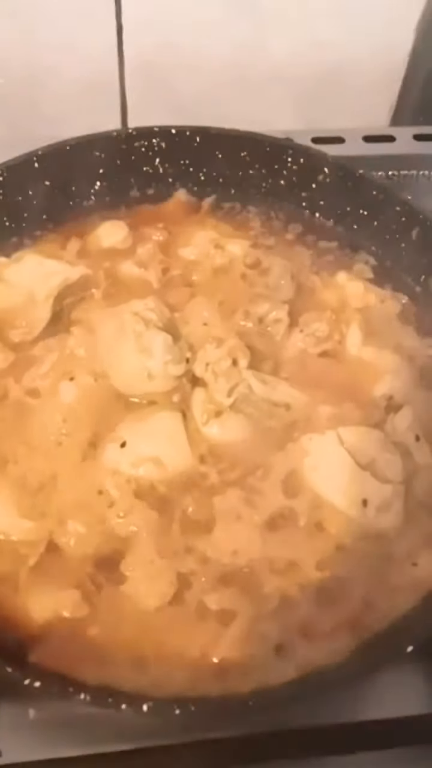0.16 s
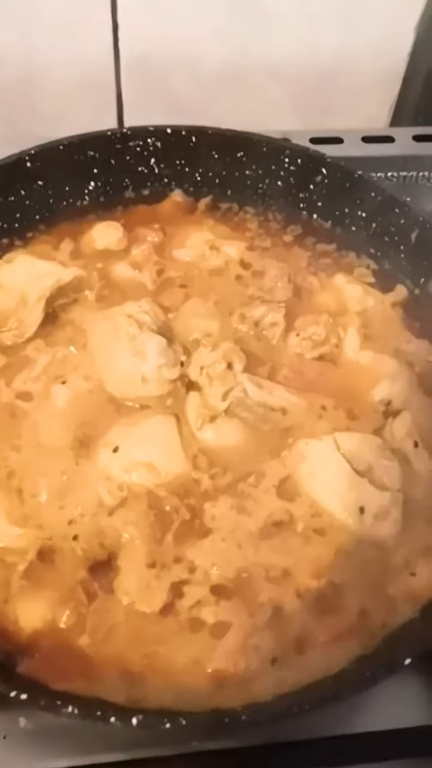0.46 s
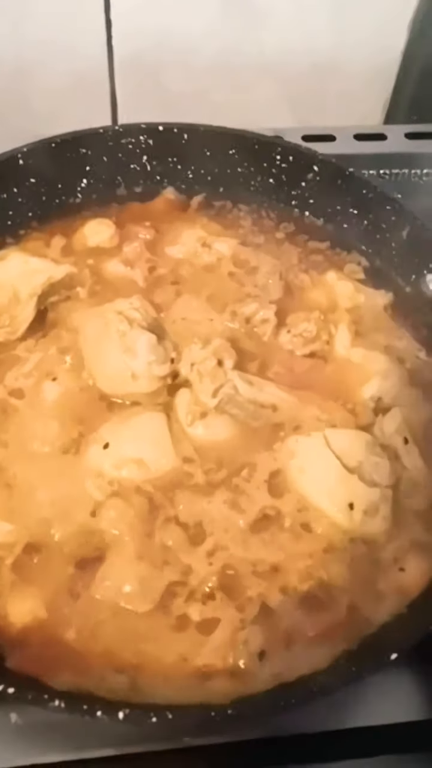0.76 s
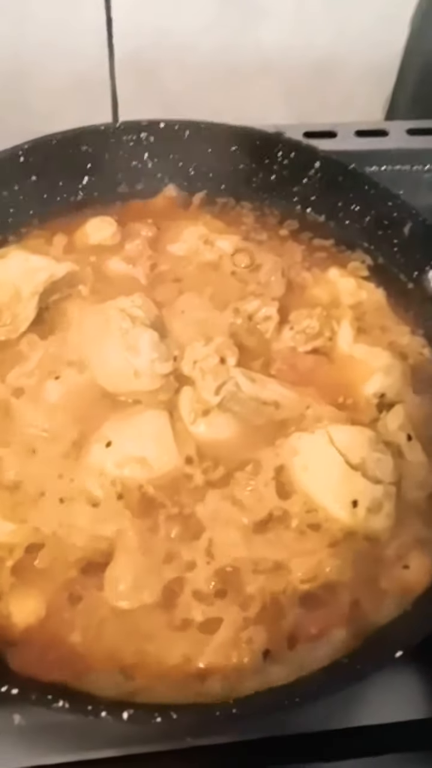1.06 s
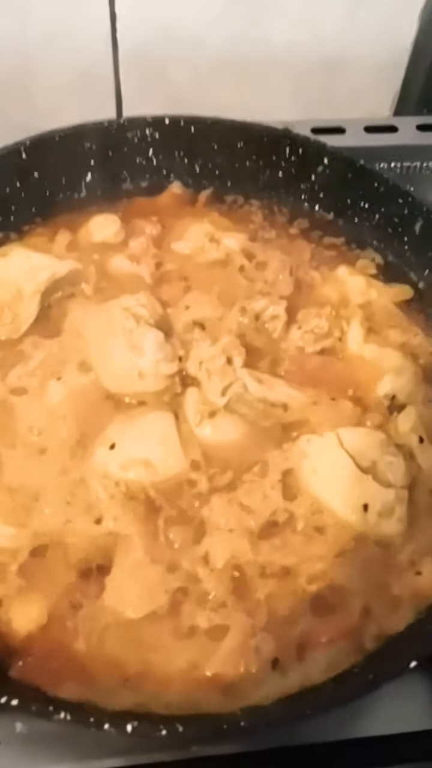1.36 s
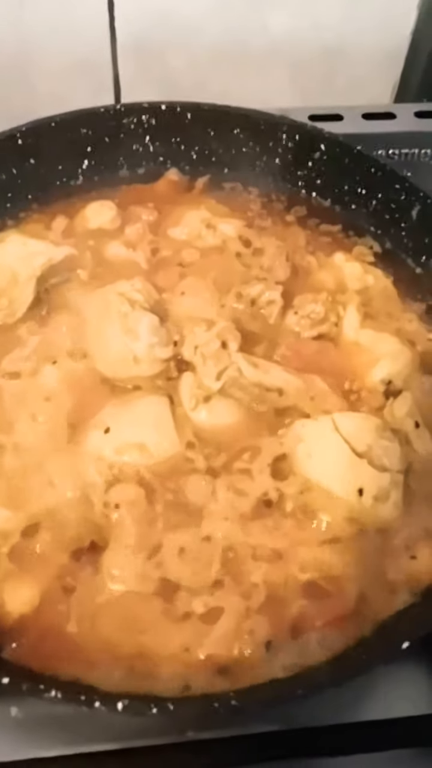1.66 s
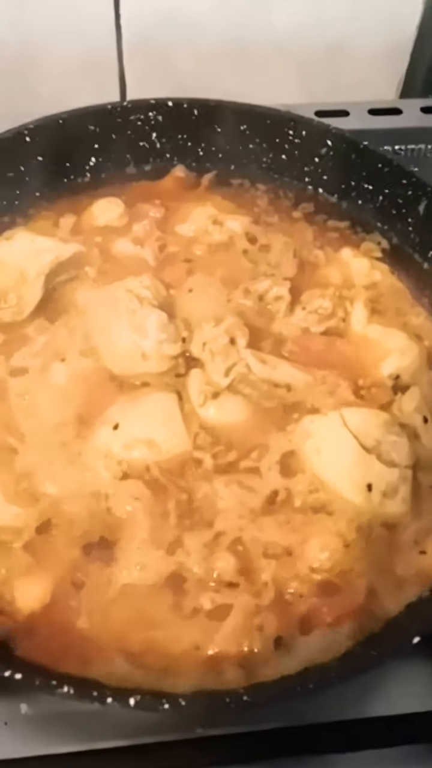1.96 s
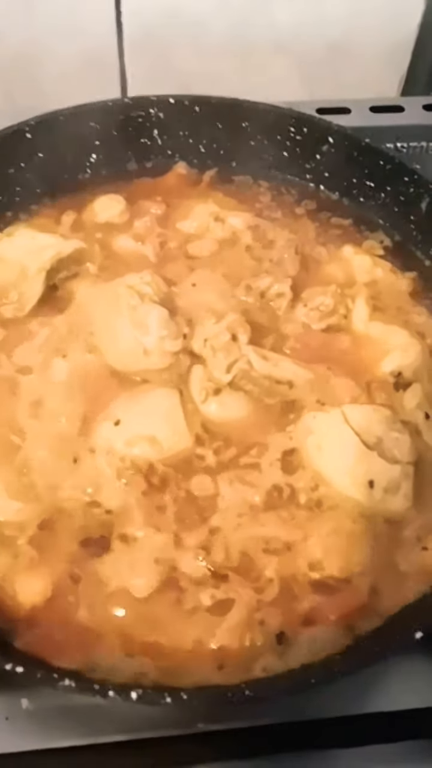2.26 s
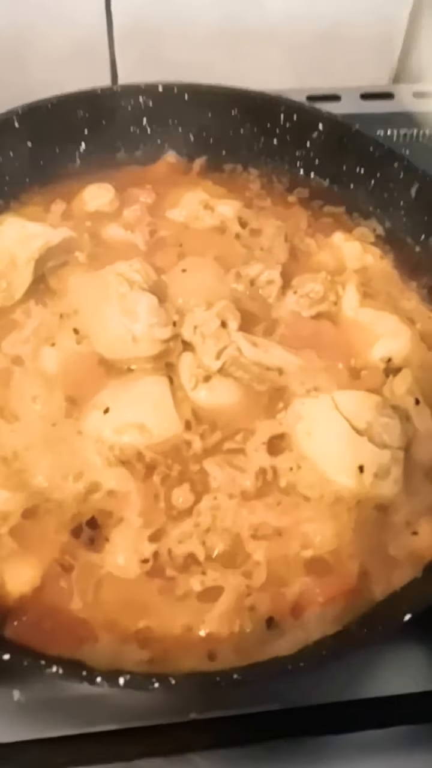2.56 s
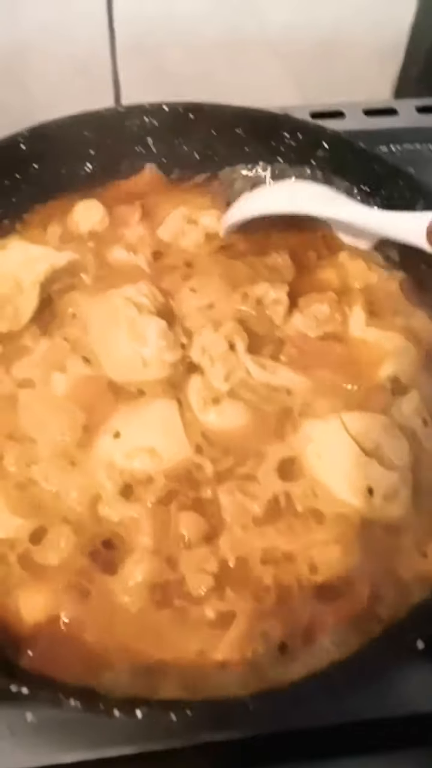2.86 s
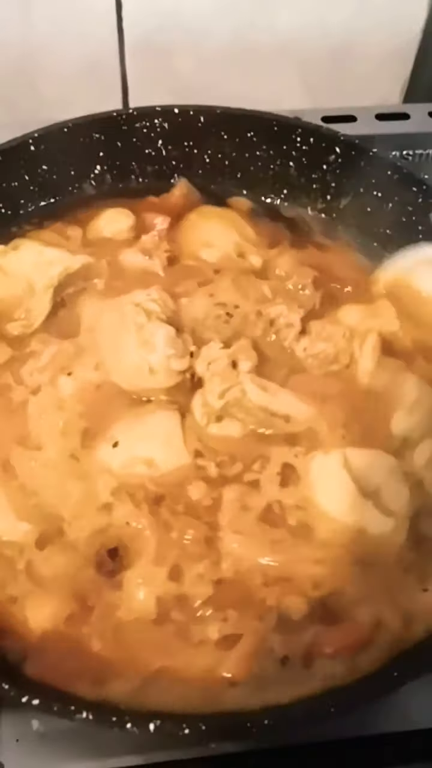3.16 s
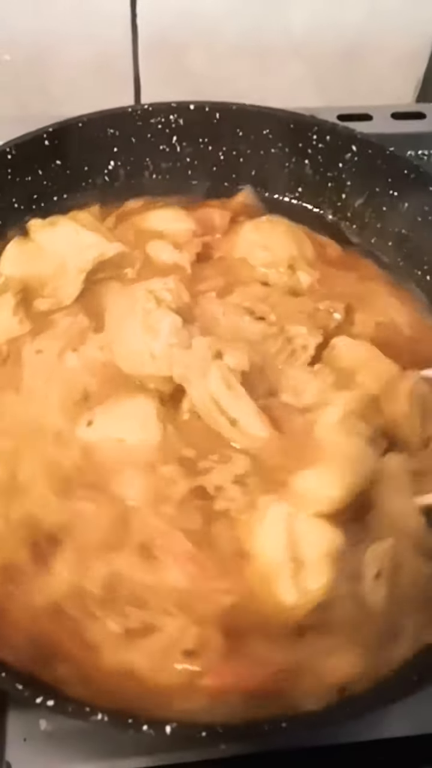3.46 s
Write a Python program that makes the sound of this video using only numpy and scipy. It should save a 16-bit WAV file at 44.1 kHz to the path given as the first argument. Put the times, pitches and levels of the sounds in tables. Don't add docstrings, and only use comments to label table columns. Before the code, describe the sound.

A glass pan lid with a metal rim clangs loudly onto a hollow worktop, rocks, scrapes and clinks to rest; then thick sauce bubbles quietly and a spoon taps the pan, close phone microphone in a tiled kitchen.

```python
import sys
import numpy as np
from scipy import signal
from scipy.fft import rfft, irfft, next_fast_len
from scipy.io import wavfile
from scipy.ndimage import uniform_filter1d, map_coordinates

SR = 44100
rng = np.random.default_rng(int(sys.argv[2]) if len(sys.argv) > 2 else 0)


def natural_amplitude(level_db):
    exponent = np.asarray(level_db, float) / 20
    return 10 ** exponent


def wav_record(signal):
    frames = np.transpose(np.atleast_2d(signal))
    bounded = np.clip(frames, -1, 1)
    quanta = np.round(bounded * 32767).astype(np.int16)
    wavfile.write(sys.argv[1], SR, quanta)


N = 158760

# start_s, clang_db, ring_time_share, crack_db, loudest_hz
LID_CLANGS = [(0, -21.5, 2.5, -65, 2000), (0.146, -1.5, 0.89, -31.5, 2060),
              (0.4256, -26.5, 0.91, -50.5, 2400), (0.4857, -33.5, 0.65, -46.5, 1699),
              (0.568, -13.5, .5, -49, 1930), (0.6398, -4, 0.84, -34.5, 1900),
              (0.8326, -23.5, 1.5, -58, 1790), (0.922, -8.5, 0.96, -34.5, 3435),
              (0.9653, -10.5, .4, -37, 1840), (0.9948, -7.5, 0.22, -26, 1910),
              (1.0194, -11, 0.49, -36, 1910), (1.042, -27.5, 0.34, -37, 2400),
              (1.1259, -17, .5, -35.5, 1820), (1.447, -32, 0.46, -55.5, 2600)]
# time_s, scrape_db, weight_db
LID_DRAG = [(0, -31.5, -42), (.12, -40, -43), (0.269, -38.5, -33), (.31, -37.5, -33.5), (.42, -42.5, -33.5),
            (0.521, -38.5, -26.5), (.7, -40, -29), (0.78, -36, -32), (0.901, -40.5, -30), (1.03, -24, -23),
            (1.1, -29.5, -29.5), (1.199, -34.5, -33.5), (1.301, -47.5, -48), (1.38, -81, -50),
            (1.419, -45, -30), (1.602, -87, -66.5)]
# start_s, peak_db, pitch_hz, t60_s
LID_SINGS = [
    (0, -39, 1916, .5),
    (.147, -16.5, 1916, 0.23),
    (.147, -19.5, 2290, 0.36),
    (.147, -26.5, 775, .4),
    (.569, -21, 1918, .2),
    (.643, -22, 1685, 0.32),
    (0.644, -22.5, 2722, 0.32),
]
# start_s, peak_db, loudest_hz
BOARD_THUDS = [(.005, -36, 81), (0.301, -22.5, 299), (.363, -29, 188), (0.399, -19.5, 320),
               (.49, -27.5, 317), (.512, -17.5, 334), (0.541, -27, 304), (.568, -6.5, 260), (.59, -15, 215),
               (0.636, -12, 170), (0.694, -18, 361), (0.829, -21.5, 300), (.854, -11.5, 300),
               (.883, -17.5, 330), (.92, -16, 156), (.97, -11.5, 183), (.994, -9.5, 300),
               (1.021, -13.5, 260), (1.09, -16.5, 253), (1.128, -19.5, 200), (1.181, -17.5, 258),
               (1.21, -26, 256), (1.26, -31, 252), (1.29, -34.5, 91), (1.396, -24, 510), (1.41, -21.5, 300),
               (1.446, -31.5, 220), (1.48, -33.5, 220), (1.509, -38.5, 158), (1.55, -47, 79),
               (1.629, -48, 70), (1.789, -49, 90)]
# start_s, peak_db, pitch_hz
RIM_CLINKS = [(0.359, -38.5, 6650), (.486, -28, 3497), (.486, -43.5, 6440), (0.547, -49, 6670),
              (0.639, -34, 6670), (1.001, -38, 6620), (1.016, -27, 6500), (1.034, -26, 6640),
              (1.058, -28.5, 6450), (1.074, -27, 6370), (1.102, -36, 6450), (1.127, -32.5, 7200),
              (1.129, -39.5, 4380), (1.397, -38, 3410), (1.412, -28.5, 1560), (1.411, -26, 2700),
              (1.411, -46, 3500), (1.455, -36, 2764), (1.0, -52.5, 12100), (1.02, -64, 14600),
              (0.432, -54, 9500)]
# start_s, peak_db, crack_db, pitch_hz
LID_CLICKS = [
    (0.546, -36.5, -47.5, 1913),
    (0.762, -10, -39, 2398),
    (0.792, -14.5, -51, 2078),
    (1.1083, -2, -39, 1750),
    (1.175, -12.5, -47, 1580),
]
# freq_hz, level_db, t60_s
LID_MODES = [(752, -27, 0.3), (1193, -16.5, 0.21), (1560, -21, 0.13), (1685, -16, 0.063), (1890, -19, 0.11),
             (1916, -4, .15), (2046, -10.5, 0.1), (2164, -16, .06), (2290, -5.5, 0.091), (2330, -13, 0.08),
             (2750, -13, .1), (2953, -10, 0.1), (3350, -12.5, 0.09), (3572, -12.5, 0.086)]
# freq_hz, level_db, t60_s
BOARD_MODES = [(45.5, -17, 0.6), (84.1, -12, 0.25), (171.4, -3, 0.12), (231.3, -6.5, 0.07),
               (262.9, -2.5, .11), (292.6, -2, 0.072), (344, -2, 0.07), (407, -15.5, 0.034),
               (549.3, -10, 0.06)]
# freq_hz, density_db_per_hz
CRACK_SPECTRUM = [(250, -8), (600, -7), (1300, -9.5), (2000, -5), (4200, -23.5), (7000, -36.5),
                  (10300, -49), (12000, -67.5)]
# freq_hz, left_minus_right_db
LID_SIDE = [(100, -0.5), (600, -4.5), (1300, -1), (4000, 3), (9000, 17.5)]
# start_s, peak_db, pitch_hz
SPIT_TICKS = [(1.7023, -58, 4700), (1.795, -61, 3593), (1.8782, -56, 4860), (2.2313, -58, 5550),
              (2.254, -63, 3590), (2.415, -62.5, 8060), (2.474, -55.5, 6330), (2.6245, -60, 5730),
              (2.652, -55, 6500), (2.844, -61, 7520), (3.0522, -55.5, 3700), (3.262, -56.5, 4610),
              (3.3768, -57.5, 5260)]
# start_s, peak_db, pitch_hz
BIG_PLOPS = [
    (1.863, -30.5, 134),
    (2.508, -25, 135.3),
    (3.003, -36.5, 186),
    (3.149, -52.5, 160),
]
# start_s, level_db, centre_hz
SIZZLES = [
    (1.861, -80, 6920),
    (1.992, -64.5, 8330),
    (2.21, -66, 7000),
    (2.501, -68, 6270),
    (2.762, -67, 7540),
    (3.05, -59.5, 6940),
]
# start_s, peak_db, pitch_hz
SMALL_BLIPS = [
    (2.687, -45.5, 782),
    (2.859, -35, 743),
    (3.02, -38, 717),
    (3.219, -42, 764),
    (3.328, -44, 698),
    (3.46, -44, 1320),
]
# freq_hz, density_db_per_hz
SIMMER_SPECTRUM = [(30, -4.5), (90, -2), (250, -8), (480, -14), (2800, -23), (3400, -30.5), (9500, -36),
                   (15600, -51.5)]
# freq_hz, left_minus_right_db
PAN_SIDE = [(200, -1), (1600, -0.5), (5000, 9), (15000, 4)]
# start_s, peak_db, rattle_t60_s, pitch_hz
SPOON_TAPS = [(2.005, -33.5, 0.29, 324), (2.006, -51, 0.9, 1500), (2.165, -43, 0.066, 996),
              (2.163, -51, .08, 330), (2.168, -44.5, .1, 1550), (3.474, -35.5, 0.075, 1636),
              (3.476, -46, 0.22, 280), (3.481, -52, 0.035, 704), (3.5064, -35.5, 0.027, 2620),
              (3.514, -57, 0.11, 2570), (3.551, -51, 0.035, 1400), (2.006, -44.5, 0.22, 730),
              (2.25, -52, 0.44, 1500)]
# freq_hz, left_right_likeness
LIKENESS = [(80, 1), (300, 0.81), (1000, 0.057), (4000, 0.1)]
# freq_hz, t60_s
KITCHEN_DECAY = [(150, 0.21), (1000, 0.28), (4000, 0.51), (12000, 0.35)]


def unit(x):
    return x / np.sqrt(np.mean(x ** 2) + 1e-20)


def along(points, hz):
    f, v = np.transpose(points)
    return np.interp(np.log(hz + 1), np.log(f + 1), v)


def wobble(rate_hz):
    knots = rng.standard_normal(int(N * rate_hz / SR) + 4)
    return map_coordinates(knots, [np.arange(N) * rate_hz / SR])


def filtered(x, response):
    m = next_fast_len(N + SR // 2)
    return irfft(rfft(x, m) * response(np.fft.rfftfreq(m, 1 / SR)), m)[..., :N]


def placed(x, side, lag_s):
    turn = np.array([[.5], [-.5]])
    return filtered(x, lambda hz: natural_amplitude(turn * along(side, hz)) * np.exp(-2j * np.pi * hz * turn * lag_s))


def add(track, start_s, sound):
    part = track[:, round(start_s * SR):][:, :sound.shape[-1]]
    part += sound[..., :part.shape[1]]


def room(x, wet_db):
    hz, t, z = signal.stft(rng.standard_normal((2, SR // 2)), SR, nperseg=256)
    alike = np.clip(along(LIKENESS, hz), 0, 1)[:, None]
    z = np.array([z[0], alike * z[0] + np.sqrt(1 - alike ** 2) * z[1]])
    decay = natural_amplitude(-60 * t / along(KITCHEN_DECAY, hz)[:, None])
    tail = signal.istft(z * decay, SR, nperseg=256)[1]
    delayed = np.pad(x.mean(0), (250, 0))[None]
    wet = signal.fftconvolve(delayed, tail / np.linalg.norm(tail[0]), axes=1)[:, :N]
    return x + natural_amplitude(wet_db) * wet


def ring(modes, spread_db, differ, attack_s, centre_hz=None, lasting=1):
    hz, db, t60_s = np.repeat(np.transpose(modes), 2, axis=1)
    t = np.arange(SR // 4) / SR
    hit, mic, detune, phase = rng.standard_normal((4, 2, len(hz)))
    level_db = db + spread_db * hit[0] + 9 * differ * np.minimum(hz / 1500, 1) * mic
    if centre_hz:
        level_db = level_db - 14 * np.log2(hz / centre_hz) ** 2
    pole = 2j * np.pi * hz * (1 + .004 * detune[0]) - np.log(1000) / (t60_s * lasting)
    start = natural_amplitude(level_db) * np.exp(1j * differ * hz / 1500 * phase)
    x = (start @ np.exp(np.outer(pole, t))).imag * (1 - np.exp(-t / attack_s))
    return x / np.abs(x).max()


def burst(hz, t60, octaves, apart):
    t = np.arange(SR // 3) / SR
    noise = rng.standard_normal(len(t)) + apart * rng.standard_normal((2, len(t)))
    edges_hz = [hz / 2 ** octaves, min(hz * 2 ** octaves, SR / 2.2)]
    band = signal.butter(2, edges_hz, "band", fs=SR, output="sos")
    return unit(signal.sosfilt(band, noise)) * natural_amplitude(-60 * t / t60)


def bubble(db, hz, turns, rise):
    u = np.arange(int(8 * turns * SR / hz)) * hz / SR / turns
    return -natural_amplitude(db) * np.e * u * np.exp(-u) * np.sin(2 * np.pi * turns * u * (1 + rise * u))


def crack(db, t60):
    t = np.arange(SR // 5) / SR
    return natural_amplitude(db - 60 * t / t60) * rng.standard_normal((2, len(t)))


def crack_coloured(x):
    return filtered(x, lambda hz: natural_amplitude(along(CRACK_SPECTRUM, hz)) * hz / (hz + 200))


def clangs():
    out, cracks = np.zeros((2, N)), np.zeros((2, N))
    for s, db, lasting, crack_db, hz in LID_CLANGS:
        tone = ring(LID_MODES, spread_db=1, differ=.12, attack_s=.0008, centre_hz=hz, lasting=lasting)
        add(out, s, natural_amplitude(db - 1) * tone)
        add(out, s, natural_amplitude(db - 11.5) * burst(hz, t60=.099 * lasting, octaves=.23, apart=1))
        add(cracks, s, crack(crack_db + 32, t60=.11) + crack(crack_db + 32, t60=.18))
    return out + crack_coloured(cracks)


def slips(rate_hz):
    hits = (rng.random(N) < rate_hz / SR) * rng.standard_normal(N)
    return unit(hits * natural_amplitude(4.5 * rng.standard_normal(N) + 3 * wobble(25)))


def excited(x, response):
    return signal.fftconvolve(x[None], response / np.linalg.norm(response[0]), axes=1)[:, :N]


def drag():
    time_s, *controls = np.transpose(LID_DRAG)
    scrape_db, weight_db = [np.interp(np.arange(N) / SR, time_s, c, right=-120) for c in controls]
    stutter = np.clip(slips(900), -5, 5)
    lid_ring = ring(LID_MODES, spread_db=-1.5, differ=.067, attack_s=.0015)
    out = excited(natural_amplitude(scrape_db - 8) * stutter, lid_ring)
    bumps = natural_amplitude(weight_db + 3.5) * np.clip(slips(2500), -3, 3)
    out += excited(bumps, ring(BOARD_MODES, spread_db=1, differ=.35, attack_s=.0032))
    out += natural_amplitude(-7.5) * excited(bumps, burst(640, t60=.12, octaves=.63, apart=.93))
    grit_db = 1.49 * (scrape_db + 33) - 13.5
    grit = natural_amplitude(grit_db) * (rng.standard_normal((2, N)) + 1.2 * stutter)
    return out + crack_coloured(grit)


def sings():
    out, t = np.zeros((2, N)), np.arange(SR // 2) / SR
    for s, db, hz, t60_s in LID_SINGS:
        add(out, s, natural_amplitude(db - 60 * t / t60_s) * np.sin(2 * np.pi * hz * t) * (1 - np.exp(-t / .002)))
    return out


def thuds():
    out = np.zeros((2, N))
    for s, db, hz in BOARD_THUDS:
        tone = ring(BOARD_MODES, spread_db=3, differ=.35, attack_s=.0039, centre_hz=hz, lasting=.85)
        add(out, s, natural_amplitude(db) * tone)
        add(out, s, natural_amplitude(db - 11.5) * burst(250 + hz, t60=.21, octaves=.85, apart=.41))
    return out


def clinks():
    out = np.zeros((2, N))
    for s, db, hz in RIM_CLINKS:
        add(out, s, natural_amplitude(db - 7.5) * burst(hz, t60=.05, octaves=.053, apart=.52))
        add(out, s, bubble(db - 5.5, hz, turns=.003 * hz, rise=0))
    add(out, .761, natural_amplitude(-55) * burst(11500, t60=.02, octaves=.42, apart=1))
    return out


def clicks():
    out, cracks = np.zeros((2, N)), np.zeros((2, N))
    for s, db, crack_db, hz in LID_CLICKS:
        add(out, s, natural_amplitude(db - 14) * burst(hz, t60=.055, octaves=.44, apart=.54))
        add(out, s, bubble(db, hz, turns=.5, rise=0))
        add(cracks, s, crack(crack_db + 44, t60=.0089))
    return out + crack_coloured(cracks)


def lid():
    body = clangs() + drag() + thuds() + clicks()
    return filtered(body, lambda hz: (1 + (hz / 11000) ** 10) ** -.5) + sings() + clinks()


def simmer():
    z = signal.stft(rng.standard_normal((2, N)), nperseg=256)[2]
    field = uniform_filter1d(rng.standard_normal(z.shape[1:]), 9, 0)
    field = uniform_filter1d(field, 12, 1)
    pair = signal.istft(z * natural_amplitude(2 * unit(field)), nperseg=256)[1][:, :N] * natural_amplitude(wobble(55))

    def mid_side(hz):
        turn = np.arccos(np.clip(along(LIKENESS, hz), -1, 1)) / 2
        return natural_amplitude(along(SIMMER_SPECTRUM, hz)) * [np.cos(turn), np.sin(turn)]

    mid, side = filtered(pair, mid_side)
    return natural_amplitude(-57) * unit(np.array([mid + side, mid - side]))


def pops():
    out = np.zeros((2, N))
    for a, b, c in rng.random((700, 3)):
        pop = bubble(-69 - 4 * np.log(c + .05), 500 * 18 ** b, turns=1.3, rise=.05)
        add(out, 3.55 * a, pop * natural_amplitude([[1], [-1]]))
    for s, db, hz in SPIT_TICKS:
        add(out, s, bubble(db + 3.5, hz, turns=1.2, rise=.021) * natural_amplitude([[3], [-3]]))
        add(out, s, natural_amplitude(db - 9) * burst(hz, t60=.14, octaves=.18, apart=.86))
    for s, db, hz in BIG_PLOPS:
        add(out, s + .0068, bubble(db + 4.5, 1.54 * hz, turns=.41, rise=-.068))
    swell = np.pad(np.hanning(int(.13 * SR)) ** .5, (0, SR))[:SR // 3]
    for s, db, hz in SIZZLES:
        add(out, s, natural_amplitude(db) * swell * burst(hz, t60=.555, octaves=.31, apart=1.5))
    for s, db, hz in SMALL_BLIPS:
        add(out, s, bubble(db, hz, turns=1.65, rise=.018))
    return out


def sauce():
    return placed(simmer() + room(pops(), wet_db=-14), PAN_SIDE, lag_s=.00055)


def spoon():
    out = np.zeros((2, N))
    for s, db, t60_s, hz in SPOON_TAPS:
        add(out, s, natural_amplitude(db - 12) * burst(hz, t60_s, octaves=.58, apart=1))
        add(out, s, bubble(db + 1, hz, turns=.5, rise=0))
    return filtered(out, lambda hz: (1 + (hz / 3500) ** 8) ** -.5)


def scene():
    lid_in_room = placed(room(lid(), wet_db=-5.5), LID_SIDE, lag_s=.000597)
    return lid_in_room + sauce() + room(spoon(), wet_db=-1.8)


def top_cut(x):
    return signal.sosfilt(signal.butter(12, 15780, fs=SR, output="sos"), x)


def record(dry):
    x = filtered(dry, lambda hz: (1j * hz / (30 + 1j * hz)) ** 2)
    limited = x / (1 + np.abs(x / .92) ** 6) ** (1 / 6)
    return top_cut(limited)


dry = scene()
out = record(dry)
wav_record(out)
```